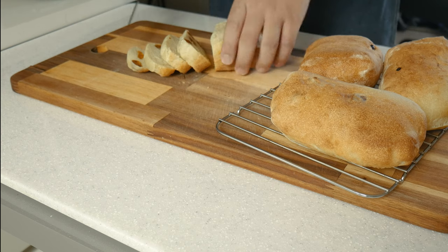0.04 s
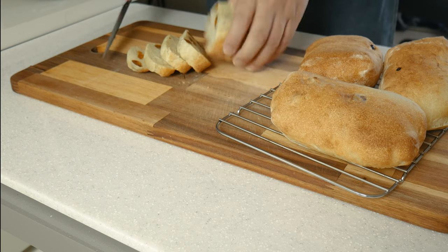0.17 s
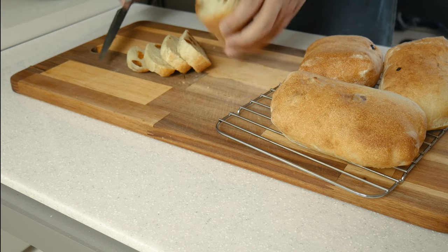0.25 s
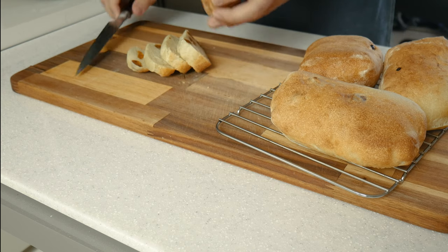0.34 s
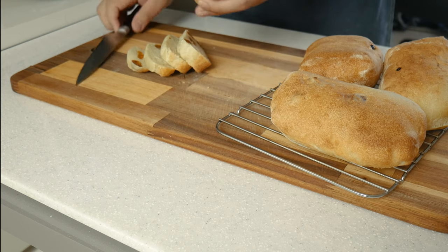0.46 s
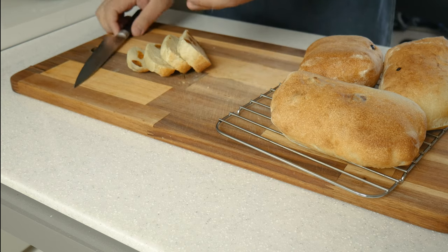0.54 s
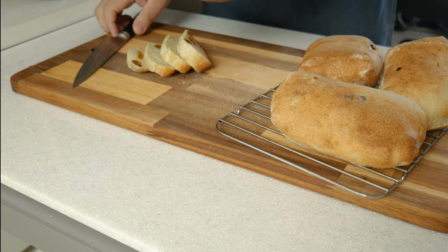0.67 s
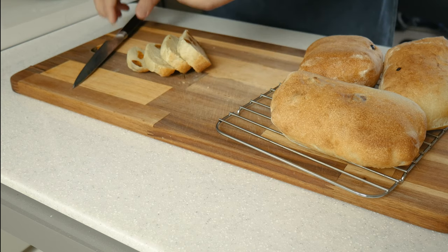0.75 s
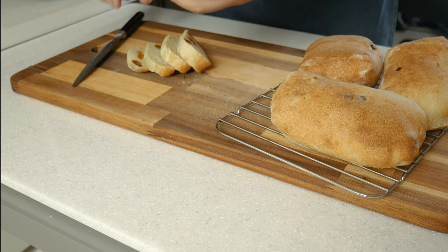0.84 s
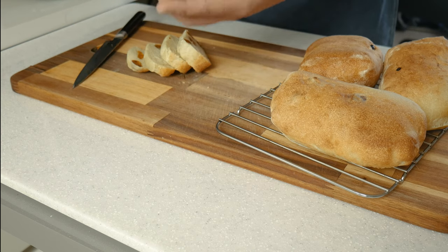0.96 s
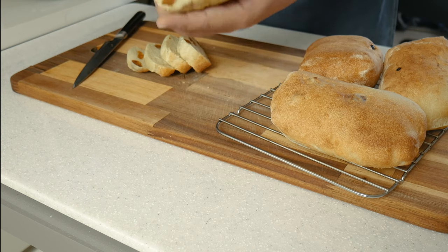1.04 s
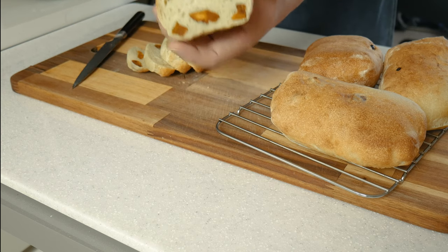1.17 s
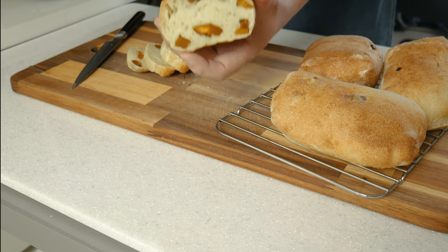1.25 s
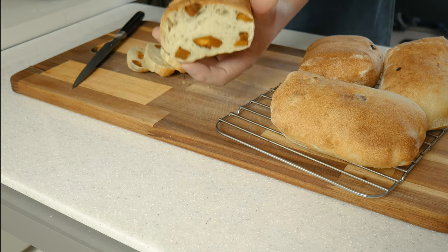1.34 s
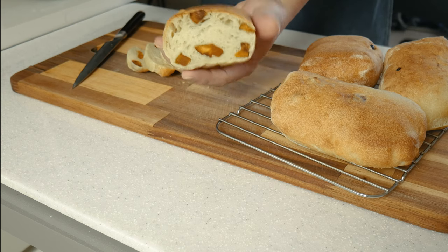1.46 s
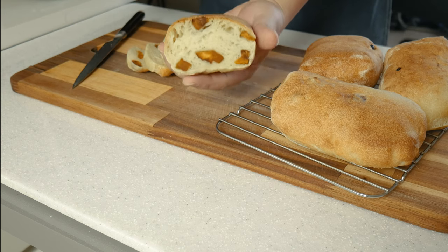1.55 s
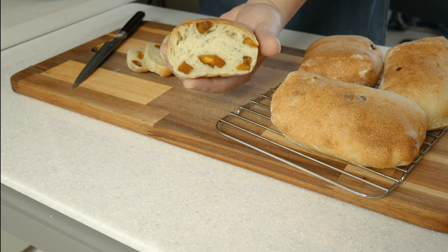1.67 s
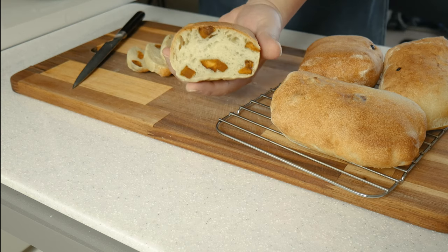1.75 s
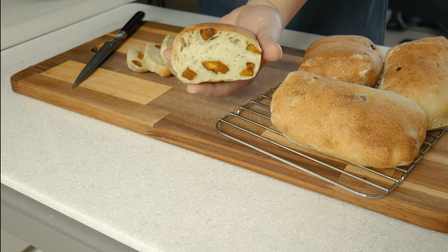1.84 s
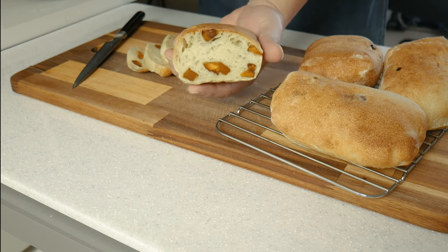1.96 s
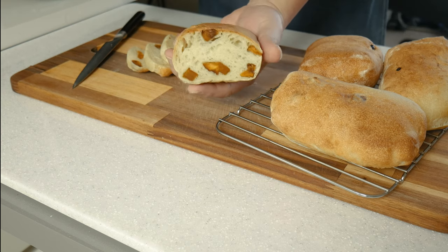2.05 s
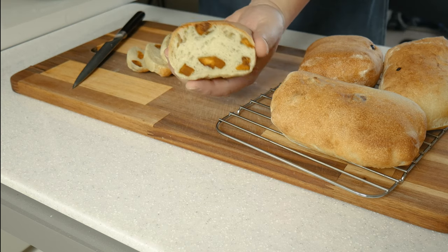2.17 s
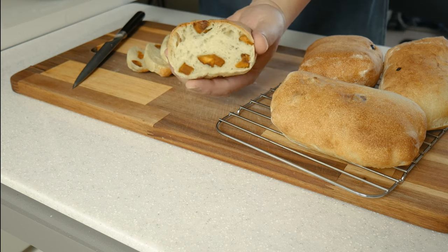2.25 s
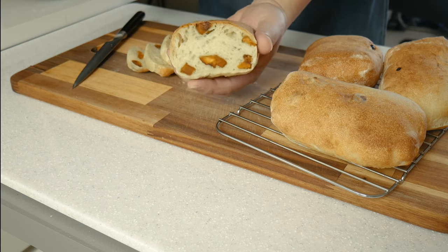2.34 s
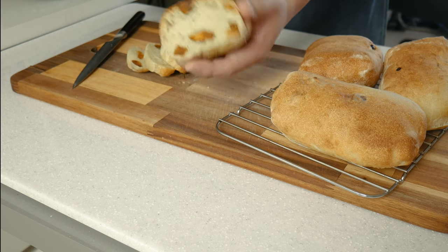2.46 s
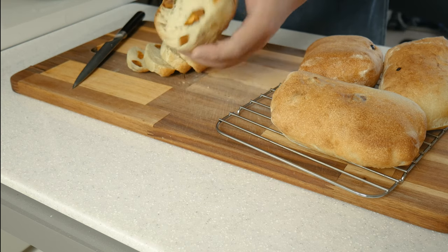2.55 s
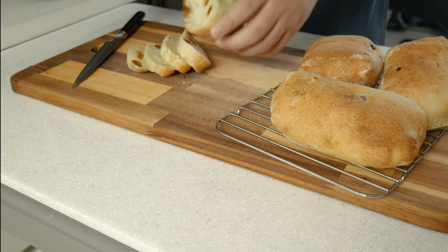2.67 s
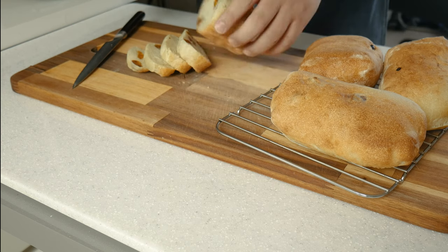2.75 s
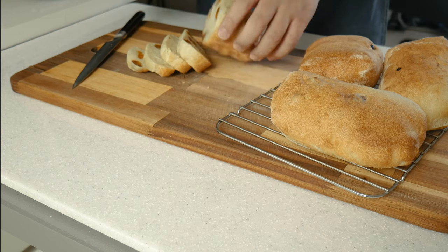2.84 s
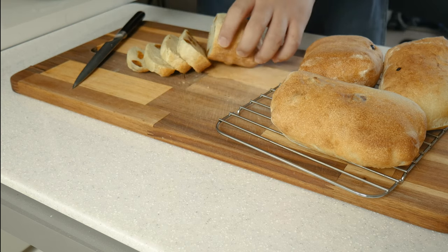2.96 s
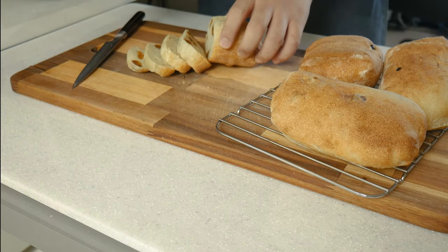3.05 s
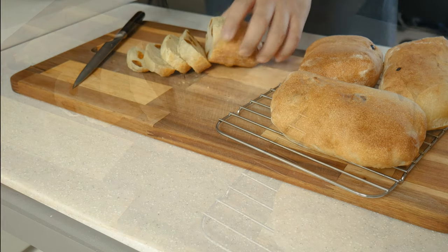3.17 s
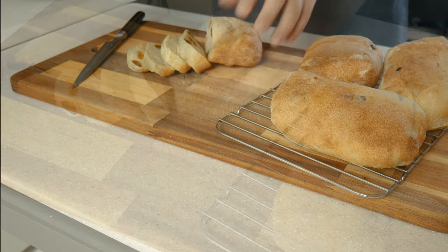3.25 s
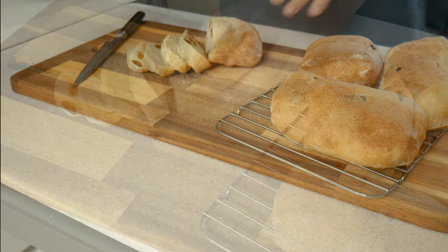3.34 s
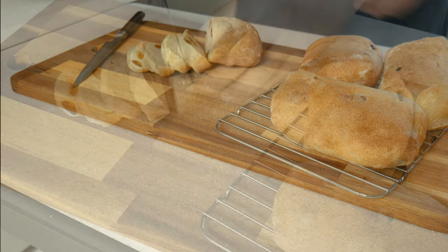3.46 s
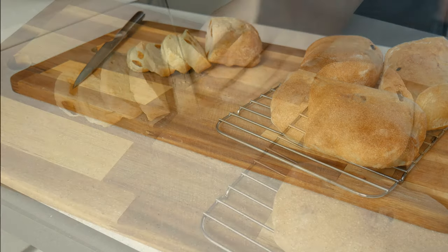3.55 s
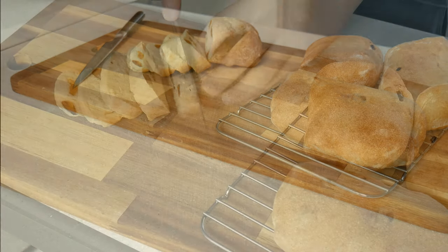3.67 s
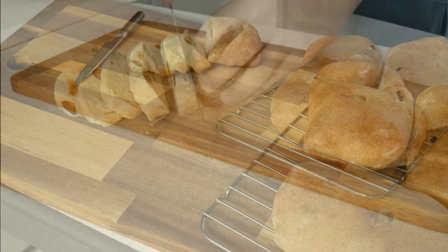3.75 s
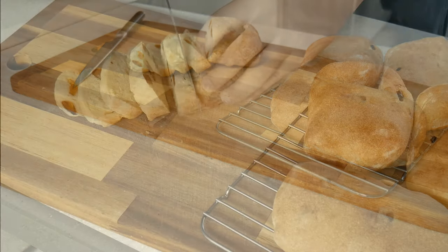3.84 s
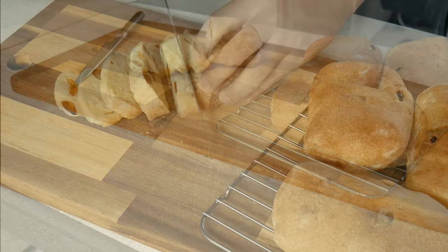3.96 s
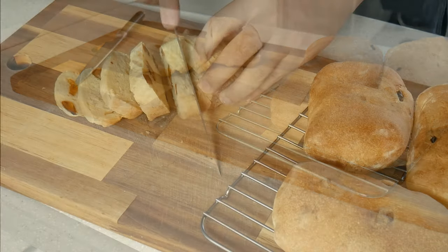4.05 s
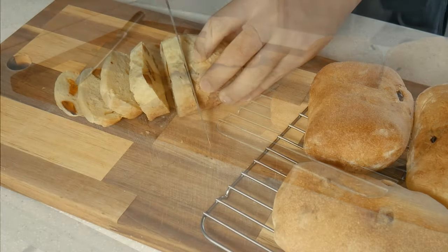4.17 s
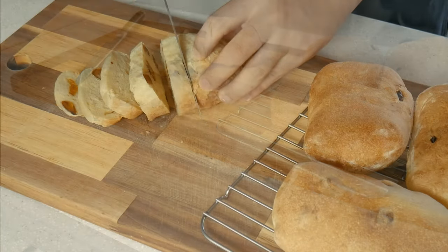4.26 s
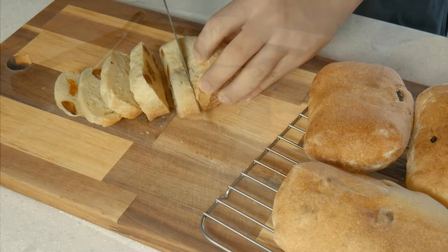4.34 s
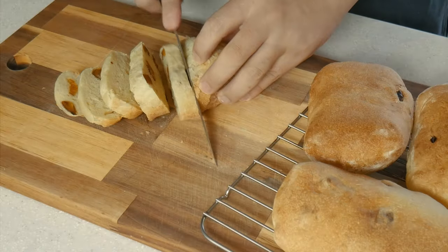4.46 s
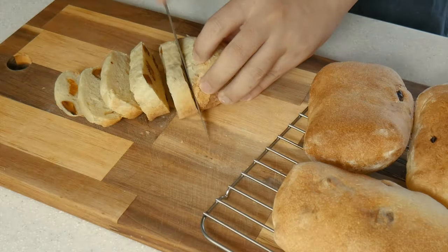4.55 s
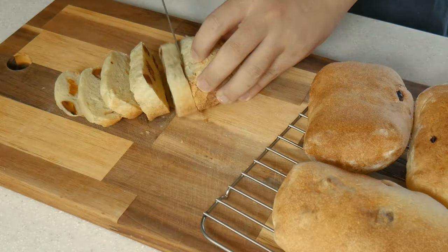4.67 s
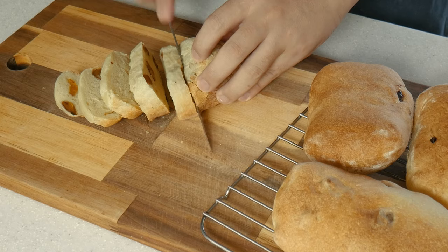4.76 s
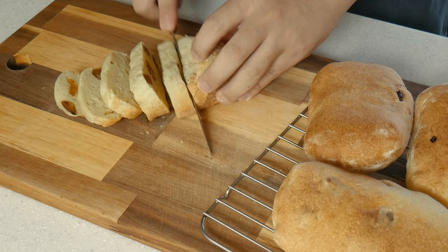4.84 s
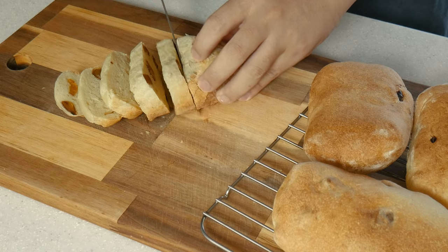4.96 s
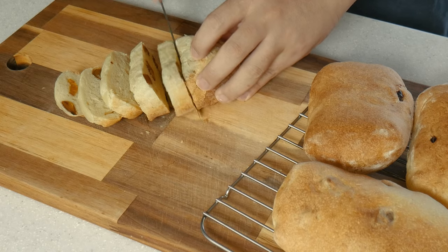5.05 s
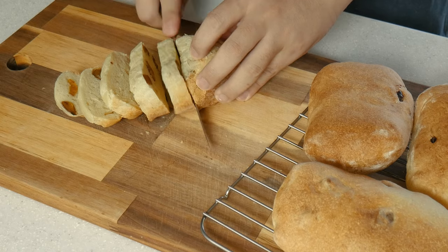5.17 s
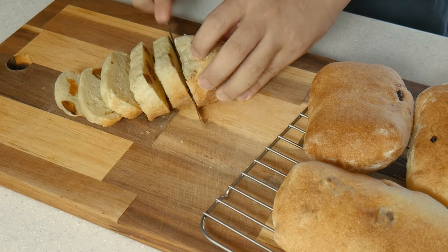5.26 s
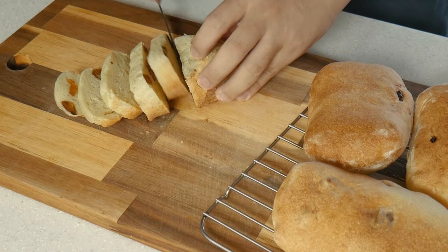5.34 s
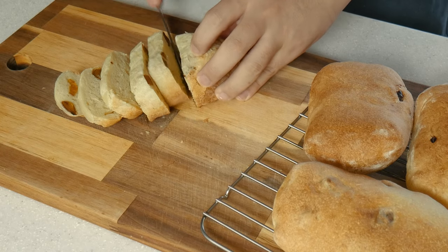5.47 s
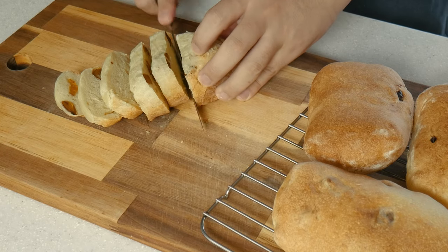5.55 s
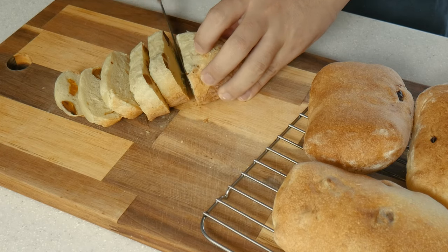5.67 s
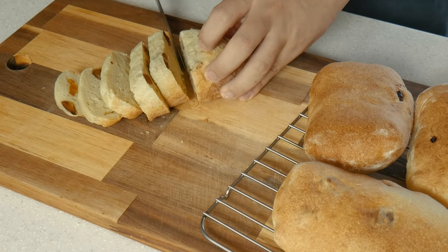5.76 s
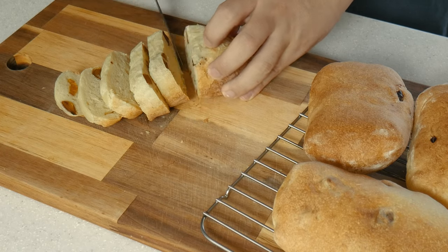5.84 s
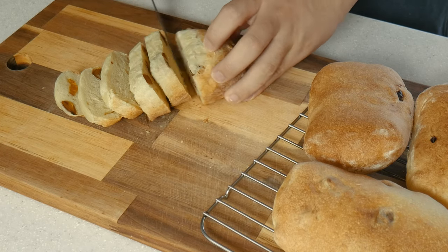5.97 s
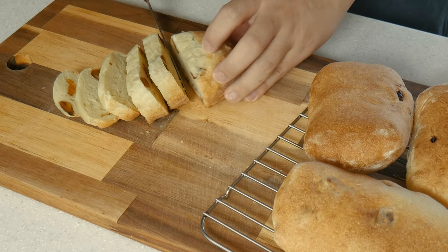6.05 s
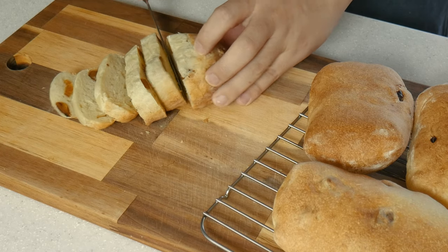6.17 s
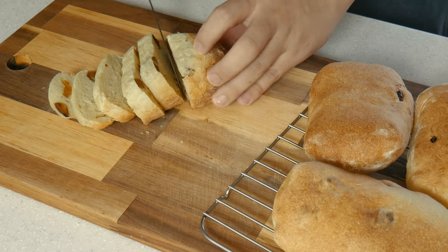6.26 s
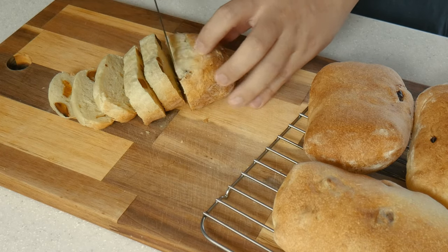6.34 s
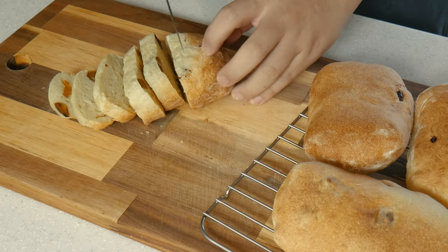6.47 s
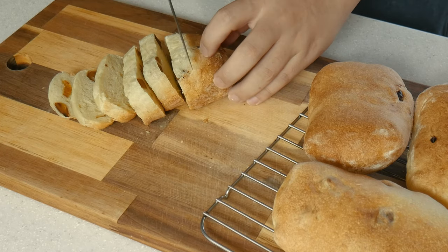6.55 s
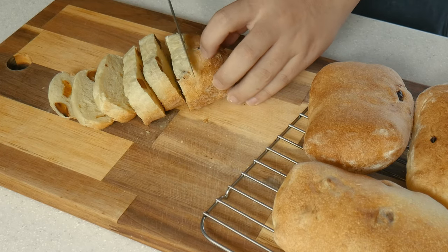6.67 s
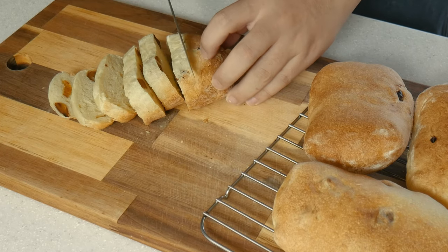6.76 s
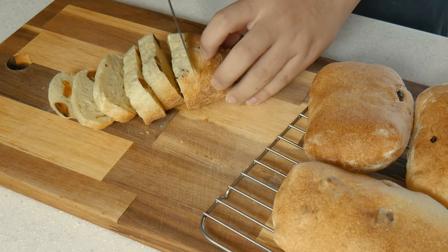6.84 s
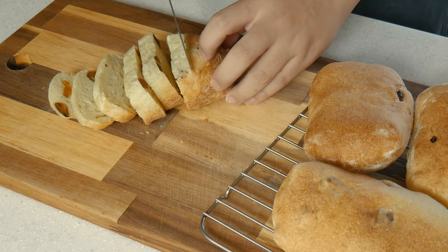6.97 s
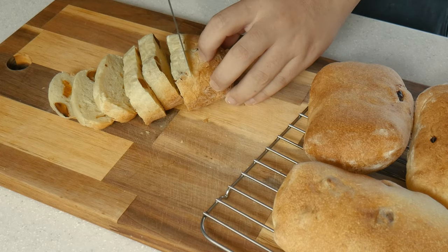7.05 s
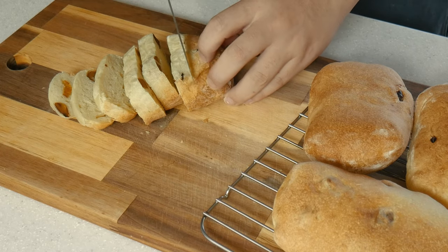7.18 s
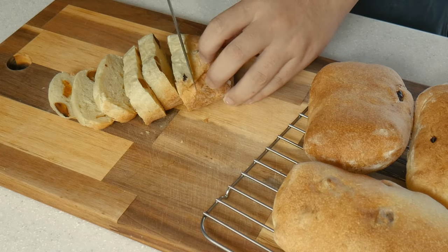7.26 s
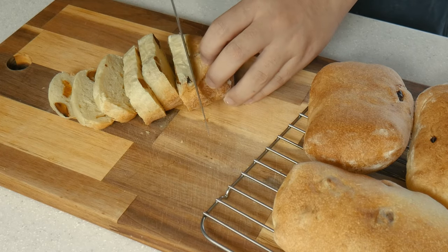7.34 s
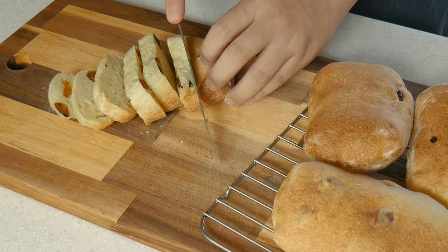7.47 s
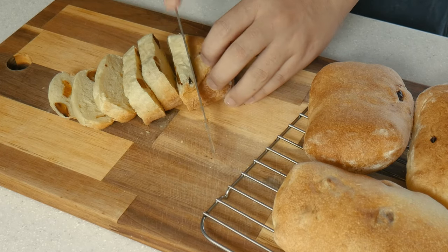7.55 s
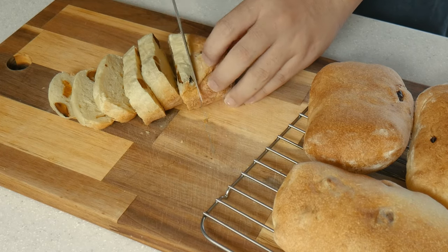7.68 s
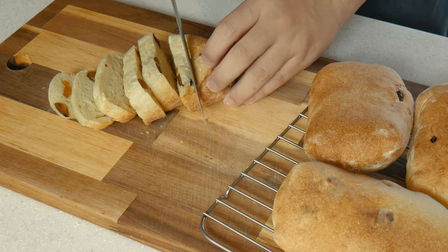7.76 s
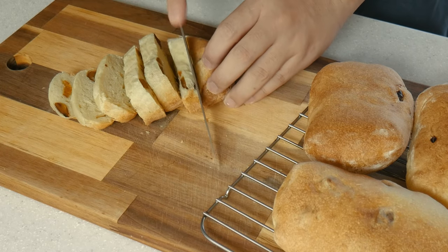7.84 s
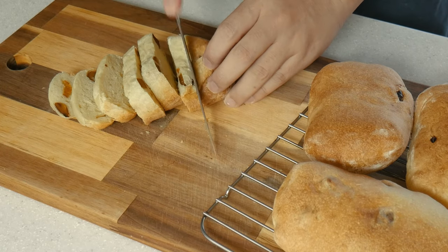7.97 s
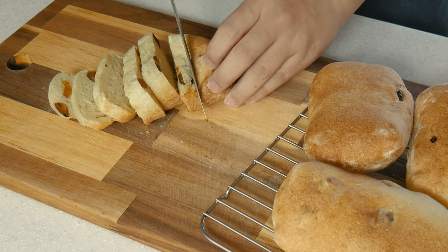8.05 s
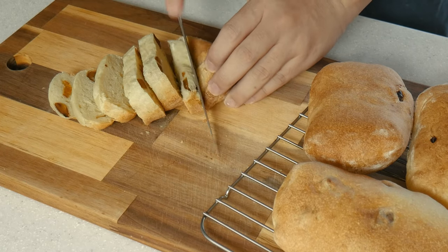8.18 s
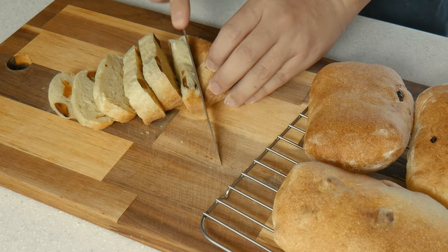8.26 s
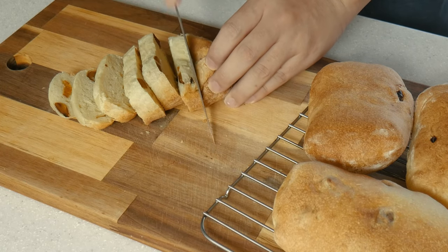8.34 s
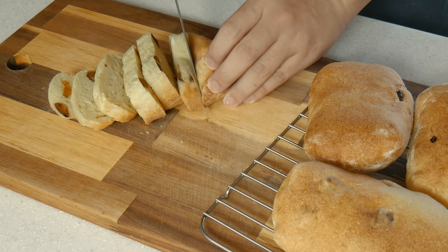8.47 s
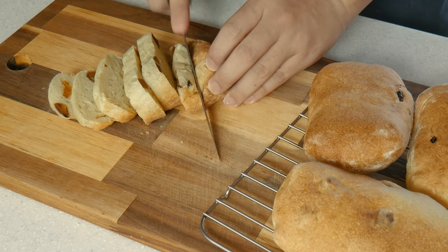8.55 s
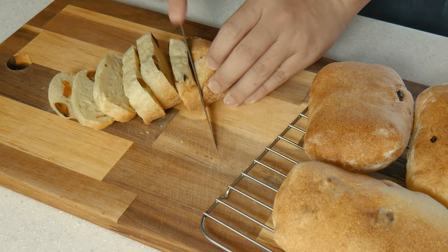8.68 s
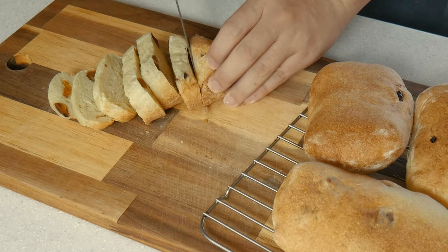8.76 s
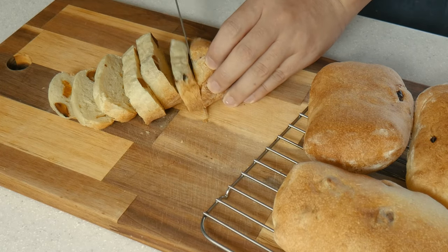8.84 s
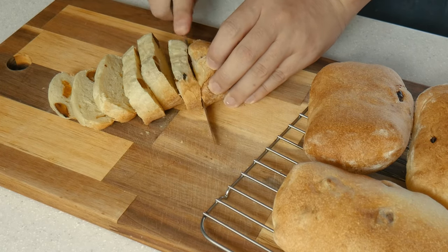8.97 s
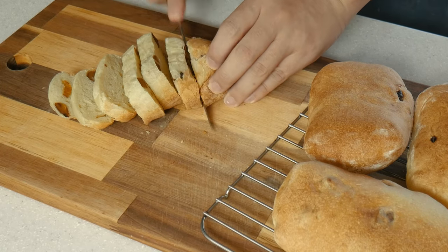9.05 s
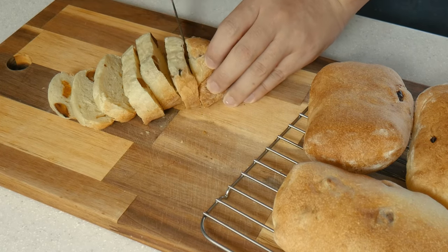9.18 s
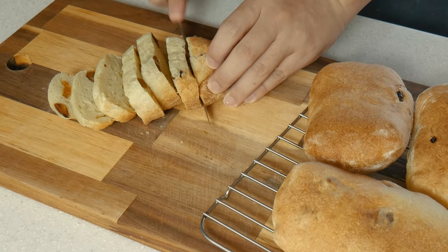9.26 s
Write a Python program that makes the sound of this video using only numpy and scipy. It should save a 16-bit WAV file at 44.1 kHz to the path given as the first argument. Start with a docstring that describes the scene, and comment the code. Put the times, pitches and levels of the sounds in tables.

```python
"""Hard kitchen, two shots, nearly mono: a knife is laid clattering on a wooden board and a loaf set down.
After the edit to a quieter shot the knife saws two slices: hiss through crumb, rasp and cracks of crust,
rubs and knocks of the board. Blows, drags and breaks excite resonances of steel, wood and crust;
shaped noise makes the air, brushing fingers and low counter thuds."""
import sys
import numpy as np
from scipy import signal
from scipy.fft import rfft, irfft
from scipy.io import wavfile
from scipy.ndimage import uniform_filter1d

SR = 44100
rng = np.random.default_rng(int(sys.argv[2]) if len(sys.argv) > 2 else 0)


def nominal_scale(level):
    """Amplitude ratio for a level in decibels (scalar or array-like)."""
    x = np.asarray(level, float) / 20
    return 10 ** x


def pcm_store(signal):
    """Save signal as 16-bit PCM."""
    levels = np.round(np.clip(np.atleast_2d(signal), -1, 1) * 32767)
    wavfile.write(sys.argv[1], SR, levels.astype(np.int16).T)


N = 410571
T = np.arange(N) / SR  # s

# modes of the wooden board: f/Hz, relative level/dB, t60/s
BOARD_MODES = [(226, -13, 0.036), (341, -5.5, 0.044), (409, -8.5, 0.045), (486.4, -3, 0.16),
               (510.8, 2.5, 0.14), (592, -4.5, 0.039), (755, -10.5, 0.018), (870, -7, .035),
               (983, -1, 0.034), (1070, -10, 0.079), (1164, -11.5, 0.032), (1800, -8, 0.078),
               (2250, -11, 0.02)]


def level(x, rms_db):
    """Scale to an rms level."""
    return x * nominal_scale(rms_db) / np.sqrt(np.mean(x ** 2))


def peak(x):
    """Scale to a peak of 1."""
    return x / np.abs(x).max()


def colour(x, points):
    """Shape the spectrum by (f/Hz, gain/dB) points, interpolated over log frequency."""
    hz, db = np.transpose(points)
    log_f = np.log(np.arange(len(x) // 2 + 1) * SR / len(x) + 1)
    return irfft(rfft(x) * nominal_scale(np.interp(log_f, np.log(hz), db)), len(x))


def band(x, low_hz, high_hz):
    """Butterworth band-pass."""
    sos = signal.butter(2, [low_hz, high_hz], "bandpass", fs=SR, output="sos")
    return signal.sosfilt(sos, x)


def ring(x, hz, width_hz):
    """One resonance, gain 1 at its centre."""
    return signal.lfilter(*signal.iirpeak(hz, hz / width_hz, SR), x)


def resound(push, modes):
    """Drive each damped mode (f/Hz, level/dB, t60/s) by a push; one row a mode."""
    rows = []
    for hz, db, t60_s in modes:
        r = 1000 ** (-1 / (t60_s * SR))
        w = 2 * np.pi * hz / SR
        rows.append(nominal_scale(db) * signal.lfilter([0, np.sin(w)], [1, -2 * r * np.cos(w), r * r], push))
    return np.array(rows)


def grains(rate_hz, spread_db):
    """Tiny breaks at random moments, a few much larger than the rest."""
    sizes = rng.standard_normal(N) * nominal_scale(spread_db * rng.exponential(size=N))
    return (rng.random(N) < rate_hz / SR) * sizes


def flicker(rate_hz, depth_db):
    """Unevenness: a gain that wanders about rate_hz times a second."""
    k = int(SR / rate_hz)
    steps = np.repeat(rng.standard_normal(N // k + 1), k)
    return nominal_scale(depth_db * uniform_filter1d(steps, k)[:N])


def swell(length_s):
    """Quick start, slower fade."""
    return np.sin(np.pi * np.linspace(0, 1, int(length_s * SR)) ** 0.6)


def add(track, s, sound):
    """Mix a sound in at time s."""
    i = int(s * SR)
    track[i:i + len(sound)] += sound[:N - i]


def blows(events, modes, scatter_db, click_hz, chatter, rattle_hz):
    """A first contact and a dying chatter of rebounds ring the modes, each blow with its own balance."""
    out, t = np.zeros(N), T[:SR // 3]
    chatter_db, rattle_db, chatter_s = chatter
    decay = np.exp(-t / chatter_s)
    click = peak(band(t == 0, click_hz / 2, click_hz * 1.23))
    for s, body_db, click_db in events:
        rebounds = (rng.random(len(t)) < 0.05) * rng.standard_normal(len(t)) * decay
        push = (t == 0) + nominal_scale(chatter_db) * rebounds / np.sqrt(np.sum(rebounds ** 2))
        # neighbouring modes start in opposite directions
        signs = (-1) ** np.arange(len(modes))
        balance = nominal_scale(scatter_db * rng.standard_normal(len(modes))) * signs
        body = band(balance @ resound(push, modes), 0.59 * modes[0][0], 11000)
        rattle = band(rebounds + 0.32 * rng.standard_normal(len(t)) * decay, *rattle_hz)
        blow = peak(body) + nominal_scale(click_db) * click + nominal_scale(rattle_db) * peak(rattle)
        add(out, s + 0.001493, nominal_scale(body_db) * blow)
    return out


def air(points, rms_db):
    """Appliance rush and microphone hiss: shaped noise, swelling a little."""
    return level(colour(rng.standard_normal(N), points) * flicker(2.82, 0.3), rms_db)


def first_air():
    """Air of the first shot, sinking slowly."""
    # noise spectrum: f/Hz, relative density/dB
    spectrum = [(25, -2.5), (48, -6), (65, -3), (117, -8.5), (200, -5), (535, -6), (1000, -9),
                (1200, -13.5), (1450, -21), (3140, -23), (5360, -25.5), (9500, -24), (14300, -29.5),
                (16500, -40)]
    fall_db_per_s = -1
    return air(spectrum, -49.5) * nominal_scale(fall_db_per_s * (T - 1.75))


def brush():
    """Fingertips over dry crust: a soft grainy hiss."""
    # brushes: t/s, length/s, gain/dB
    brushes = [(.045, 0.064, -46.5), (1.09, 0.057, -56.5), (1.16, .05, -60), (1.26, 0.082, -56),
               (3.284, .06, -52)]
    touch = np.zeros(N)
    for s, length_s, db in brushes:
        add(touch, s, nominal_scale(db) * swell(length_s))
    return touch * level(ring(grains(6000, 2.5), 3200, 7400), 0)


def tip_touches():
    """The tip of the held blade touches down: short, hand-damped steel modes."""
    # touches: t/s, body peak/dB
    touches = [(.4285, -25.5), (.479, -18), (0.5114, -14.5), (0.547, -37)]
    # modes of the held blade: f/Hz, relative level/dB, t60/s
    modes = [(195, -19.5, 0.28), (910, -12, 0.045), (3630, -5, 0.023), (3877, 1, 0.03), (4160, -5, 0.037),
             (4620, -4.5, 0.02), (5300, -22, .04), (5900, -13, 0.041), (6660, -14, 0.032),
             (6920, 4.5, 0.022), (8630, -9, 0.022), (10000, -15, .025), (10900, -18, .025),
             (12100, -24, 0.023)]
    click_db = -6.5  # re body peak
    chatter = (6.6, -4, 0.017)  # rebounds/dB re first contact, rattle/dB re body, decay/s
    events = [(s, db, click_db) for s, db in touches]
    return blows(events, modes, 1.1, 3100, chatter, (2500, 12000))


def clicks_and_taps():
    """Short clicks: crust cracks, knife contacts and small dull taps, each a few cycles plus noise."""
    # clicks: t/s, level/dB, centre f/Hz
    clicks = [(.547, -13, 2240), (.549, -21.5, 900), (.575, -24, 910), (0.6993, -17, 6500),
              (2.23, -41, 2200), (2.9475, -21, 5200), (3.2329, -28.5, 890), (3.2353, -28, 3500),
              (3.2392, -31.5, 1190), (3.292, -50, 1290), (3.309, -39, 5000), (3.768, -23, 7100),
              (4.142, -19.5, 3200), (4.1694, -18.5, 2960), (4.344, -21, 3080), (4.4194, -13, 6050),
              (4.5044, -21, 2920), (4.5224, -15, 2800), (4.556, -16, 3000), (4.585, -22, 3070),
              (4.8791, -13, 6000), (4.889, -13.5, 5940), (5.0126, -15.5, 3970), (5.1213, -7, 3200),
              (6.562, -36, 2900), (6.5677, -33, 1040), (6.612, -39, 1020), (6.648, -48, 1000),
              (6.798, -40.5, 5000), (7.101, -22, 6060), (7.113, -34, 4000), (7.141, -33, 4000),
              (7.1695, -34, 4800), (7.215, -33.5, 1900), (7.282, -27.5, 5930), (7.7428, -33, 5940),
              (7.95, -24.5, 2900), (8.126, -28, 3640), (8.6985, -24, 1800), (8.8448, -28, 3040)]
    out, t = np.zeros(N), T[:SR // 50]
    for s, db, hz in clicks:
        cycles = np.sin(2 * np.pi * hz * t) * t * hz / 1.83 * np.exp(1 - t * hz / 1.095)
        burst = 0.42 * ring(rng.standard_normal(len(t)), hz, 2.1 * hz) * np.exp(-t / 0.0014)
        add(out, s, nominal_scale(db) * (cycles + burst))
    return out


def knife_drops():
    """The knife is let go and clatters: longer modes of the loose knife."""
    # drops: t/s, body peak/dB, contact click re body/dB
    drops = [(.6435, -15.5, 14), (.678, -23.5, -15), (.698, -16, 7), (.717, -29.5, -19)]
    # modes of the loose knife: f/Hz, relative level/dB, t60/s
    modes = [(195.5, -13.5, 0.24), (326, -15, 0.15), (474, -8, 0.097), (657, -5, 0.084), (855, -1.5, 0.04),
             (1101, 6.5, 0.09), (1150, -6, 0.2), (1816, -6, 0.088), (2210, -9, .05), (2600, -9, 0.048),
             (3020, -22, 0.032), (3690, -21, .05), (4190, -5.5, 0.072), (4500, -21, .07),
             (5314, -19, 0.095), (6610, -10, 0.087), (8400, -13, 0.052)]
    chatter = (7.6, -4.5, 0.035)  # rebounds/dB re first contact, rattle/dB re body, decay/s
    return blows(drops, modes, 2.3, 1800, chatter, (700, 5500))


def thuds():
    """The hand's weight shakes the counter: a short swell of noise around one low resonance."""
    # thuds: t/s, rms/dB, f/Hz
    shakes = [(0.691, -54.5, 72), (2.951, -55.5, 72), (4.539, -55, 72.5), (4.90, -65, 72), (4.90, -53, 158),
              (5.17, -46, 74), (5.169, -50, 150), (5.26, -52.5, 140), (5.545, -53, 72), (7.988, -58, 73),
              (8.33, -54.5, 140), (8.36, -57, 70.5), (8.708, -54, 72.5), (8.931, -59, 75),
              (9.015, -48.5, 161), (9.07, -53, 140), (9.058, -52, 75), (9.23, -59, 75.6)]
    out, t = np.zeros(N), T[:SR // 8]
    for s, rms_db, hz in shakes:
        # the first half is the filter's run-in
        shudder = band(rng.standard_normal(2 * len(t)), 0.6 * hz, 1.17 * hz)[len(t):]
        add(out, s, level(shudder * t ** 2 * np.exp(-t / 0.016), rms_db))
    return out


def loaf_down():
    """The loaf is set down: dull, strongly damped modes."""
    # contacts: t/s, body peak/dB, contact click re body/dB
    contacts = [(2.9455, -26, 4.5), (2.975, -30.5, -15)]
    # modes of the loaf on the board: f/Hz, relative level/dB, t60/s
    modes = [(192, -4.5, 0.053), (290, -5.5, 0.05), (437, 2, .04), (710, -13, 0.017), (970, -4, 0.017),
             (1730, -5, 0.024), (2450, -4, 0.0092)]
    chatter = (1, 0.5, 0.018)  # rebounds/dB re first contact, rattle/dB re body, decay/s
    return blows(contacts, modes, 1.8, 1260, chatter, (150, 7000))


def second_air():
    """Air of the second, quieter shot."""
    # noise spectrum: f/Hz, relative density/dB
    spectrum = [(25, -4.5), (46, -10), (66, -5), (130, -15), (179, -7), (200, -7), (323, -5), (404, -12),
                (506, -6), (634, -13), (4530, -27), (5360, -23), (7730, -25.5), (15200, -26.5),
                (16500, -51)]
    return air(spectrum, -56)


def strokes():
    """Gains of hiss, rasp and high ring: the blade speeds up from each turn and slows into the next."""
    # strokes, each ending where the next begins or the blade rests:
    # turn t/s, fastest t/s, crumb hiss gain/dB, crust rasp gain/dB, board high ring gain/dB
    table = [(3.44, 3.64, -44, -65, -61), (3.739, 3.8, -39.5, -69, -53), (3.929, 4.06, -36, -41, -52.5),
             (4.12, 4.178, -39, -42.5, -56), (4.313, 4.383, -39.5, -38, -52),
             (4.49, 4.57, -40.5, -34.5, -57), (4.68, 4.729, -43, -40, -54),
             (4.87, 4.875, -39.5, -41.5, -58), (5.019, 5.017, -42.5, -54, -55),
             (5.104, 5.127, -32.5, -34, -33), (5.218, 5.323, -41.5, -29, -43.5),
             (5.433, 5.527, -42.5, -30.5, -48.5), (5.589, 5.664, -45.5, -31, -51),
             (5.864, 5.98, -49.5, -43, -53), (6.103, 6.168, -51, -45, -52.5), (7.08, 7.44, -47.5, -56, -55),
             (7.514, 7.575, -44.5, -53, -73), (7.734, 7.852, -37.5, -41, -45.5),
             (7.933, 8.005, -38, -39, -50.5), (8.108, 8.228, -37, -41, -46),
             (8.293, 8.366, -42, -39.5, -55), (8.462, 8.554, -39, -41.5, -46),
             (8.66, 8.715, -45.5, -46, -46.5), (8.84, 8.92, -41, -36.5, -42),
             (9.016, 9.083, -47.5, -39.5, -51), (9.204, 9.327, -41.5, -33.5, -41.5)]
    rests_s = (6.3, 9.42)  # the blade comes to rest after each slice
    at_turn_db = (-14, -8.5, -7)  # what is left of hiss, rasp and ring while the blade turns round
    speed_power = (1.13, 2.33, 0.84)  # their gain grows as blade speed to this power
    turn, fastest, *gains_db = np.transpose(table)
    ends = np.sort(np.append(turn, rests_s))
    stop = ends[np.searchsorted(ends, turn) + 1]
    k = np.clip(np.searchsorted(turn, T) - 1, 0, None)  # stroke under way
    rising = (T - turn[k]) / (fastest - turn)[k]
    falling = (stop[k] - T) / (stop - fastest)[k]
    way = np.where(T < fastest[k], rising, falling)
    speed = np.sin(np.pi / 2 * np.clip(way, 0, 1))

    def slew(x):
        return uniform_filter1d(1.0 * x, SR // 20)

    return [nominal_scale(slew(db[k])) * (speed ** power + nominal_scale(left_db) * slew(way > 0))
            for db, left_db, power in zip(gains_db, at_turn_db, speed_power)]


def saw():
    """Dense breaks under the edge sound as hiss, ring the crust and blade, and shake the board."""
    # crumb spectrum: f/Hz, gain/dB
    crumb_spectrum = [(350, -12), (600, -6.5), (643, -3), (931, -6.5), (1240, 1), (1470, -11.5),
                      (1880, -6.5), (4110, -4.5), (4460, -8), (6290, -1.5), (11200, -7), (16000, -24)]
    # crust and blade resonances: f/Hz, width/Hz, gain/dB
    crust_rings = [(2210, 11, 0.5), (2770, 110, -8), (3200, 22, -5), (4050, 170, -5.5), (5000, 210, -37.5),
                   (5320, 220, -5.5), (6050, 25, -2)]
    # board's low ring: t/s, gain/dB
    low_ring = [(3.3, -72), (3.9, -60), (4.4, -49.5), (4.6, -54.5), (5.2, -51), (5.45, -57), (6.1, -59),
                (6.4, -66.5), (7.1, -68.5), (7.5, -53), (7.7, -59.5), (8.0, -53.5), (8.55, -54),
                (9.0, -58.5), (9.3, -47.5)]
    hiss_gain, rasp_gain, high_gain = strokes()
    low_gain = nominal_scale(np.interp(T, *np.transpose(low_ring)))
    crumb = colour(grains(12000, 0.61), crumb_spectrum) * flicker(40, 1.73)
    edge = grains(5000, 1.05) * flicker(60, 2.1)
    crust = sum(nominal_scale(db) * ring(edge, hz, width_hz) for hz, width_hz, db in crust_rings)
    crust = crust + 0.34 * ring(edge, 2580, 2100)
    board = resound(grains(3000, 2) * flicker(45, 4.6), BOARD_MODES)
    low = band(board[:6].sum(axis=0), 285, 740)
    high = band(board[6:11].sum(axis=0), 750, 1800)
    out = hiss_gain * level(crumb, 0.57)
    out += rasp_gain * level(band(crust, 1500, 4030), -6.4)
    out += high_gain * level(high, -0.97)
    return out + low_gain * level(low, -0.73)


def drags():
    """The edge drags: stick-slip feeds one narrow mode of board or blade."""
    # drags: t/s, length/s, f/Hz, rms before the swell/dB
    rubs = [(3.388, 0.15, 4130, -64), (5.127, 0.1, 507, -34), (5.151, 0.026, 1010, -23),
            (5.247, 0.11, 1030, -39), (5.488, 0.11, 1020, -37.5), (5.62, 0.098, 1070, -35.5),
            (5.691, 0.089, 870, -43.5), (5.94, 0.15, 518, -40), (5.95, 0.06, 6700, -54),
            (5.949, .11, 8300, -49), (5.955, .07, 10000, -50), (6.75, .045, 5270, -70),
            (6.788, 0.07, 5270, -63), (8.887, 0.077, 506, -37.5), (8.69, 0.085, 6240, -49),
            (9.04, 0.066, 2490, -46), (9.27, 0.06, 1234, -39)]
    # wood is damped in proportion to pitch, steel far less
    width_share, widest_hz = 0.075, 130
    out, run_in = np.zeros(N), SR // 10
    for s, length_s, hz, rms_db in rubs:
        width_hz = min(width_share * hz, widest_hz)
        shape = swell(length_s)
        slips = rng.standard_normal(len(shape) + run_in)
        sing = ring(ring(slips, hz, width_hz), hz, 2 * width_hz)[run_in:]
        add(out, s, level(sing, rms_db) * shape)
    return out


def board_knocks():
    """Knocks ring the board's modes, with faint rebounds."""
    # knocks: t/s, body peak/dB, contact click re body/dB
    knocks = [(4.067, -17, 0.5), (4.431, -21, 1), (4.521, -36.5, -8), (4.877, -24.5, -8.5), (5.12, -20, -9),
              (8.238, -19.5, 5), (8.534, -20, 0.5), (8.696, -37.5, 10.5), (8.843, -42, 6)]
    chatter = (-5.5, -6.5, 0.014)  # rebounds/dB re first contact, rattle/dB re body, decay/s
    return blows(knocks, BOARD_MODES, 2.4, 740, chatter, (350, 2500))


def room(x):
    """Hard kitchen walls: a dense tail building up over 2.1 ms, the treble dying first."""
    t60_s, treble_t60_s, tail_db = 0.4, 0.35, -5
    t = T[:int(0.6 * SR)]
    noise = rng.standard_normal(len(t)) * np.clip(t / 0.0021, 0, 1)
    low = signal.lfilter(*signal.butter(1, 2500, fs=SR), noise)
    tail = low * 1000 ** (-t / t60_s) + (noise - low) * 1000 ** (-t / treble_t60_s)
    tail *= nominal_scale(tail_db) / np.sqrt(np.sum(tail ** 2))
    return x + signal.fftconvolve(x, tail)[:N]


def stereo_trace(mid):
    """Nearly mono: left and right part only by a faint scrambled side signal and hiss."""
    # stereo width: f/Hz, scrambled share re mid/dB
    width = [(60, -35), (110, -24), (200, -29), (380, -25), (700, -30), (1290, -34.5), (2380, -30.5),
             (4400, -27), (8120, -21.5), (15000, -19)]
    hiss_db = -69.5  # opposite in sign left and right
    smear = rng.standard_normal(SR // 50)
    smear /= np.sqrt(np.sum(smear ** 2))
    side = colour(signal.fftconvolve(mid, smear)[:N], width)
    side += nominal_scale(hiss_db) * rng.standard_normal(N)
    return np.array([mid + side, mid - side])


def scene():
    """Two shots butt-joined: the edit chops the first one's tail and background."""
    edit_s, join_s = 3.021, 0.004
    hits = tip_touches() + clicks_and_taps() + knife_drops() + loaf_down() + drags() + board_knocks()
    first = room(hits * (T < edit_s)) + first_air()
    second = room(hits * (T >= edit_s)) + saw() + second_air()
    later = np.clip((T - edit_s) / join_s, 0, 1)
    mid = (1 - later) * first + later * second + thuds() + brush()
    return stereo_trace(mid)


def top_cut(x):
    """Nothing passes above the cut-off."""
    return signal.sosfilt(signal.butter(12, 17150, fs=SR, output="sos"), x)


def record(dry):
    """A steep low-pass cuts the top."""
    top_hz = 16150
    sos = signal.ellip(8, 0.2, 60, top_hz, fs=SR, output="sos")
    mix = signal.sosfilt(sos, dry)
    return top_cut(mix)


dry = scene()
out = record(dry)
pcm_store(out)
```